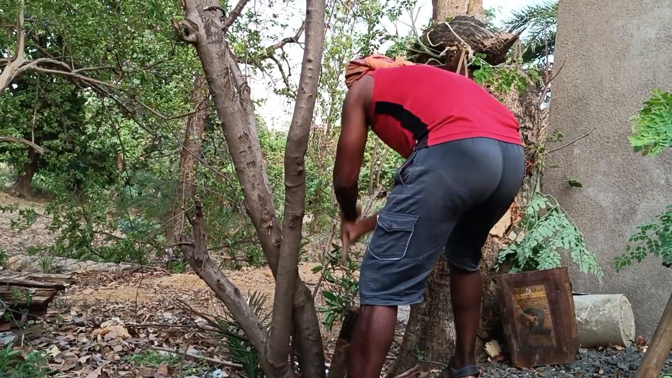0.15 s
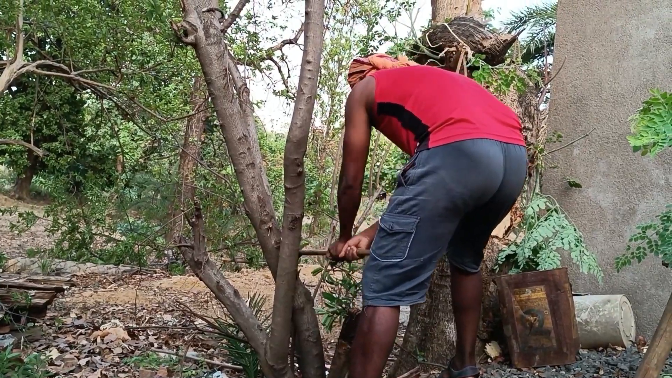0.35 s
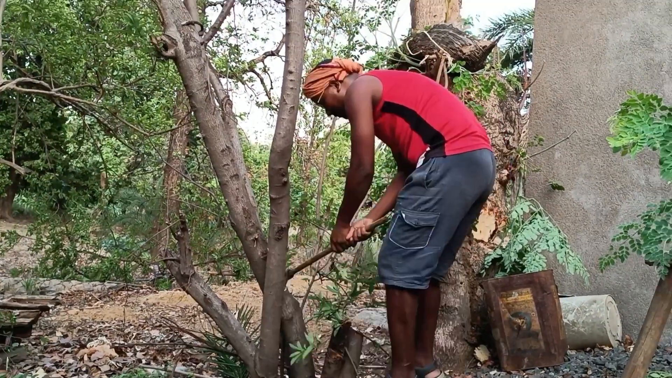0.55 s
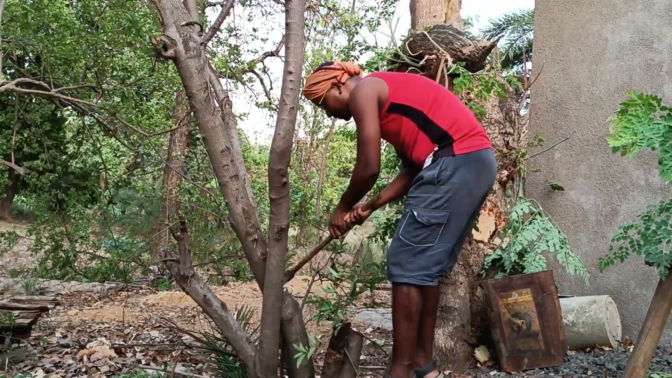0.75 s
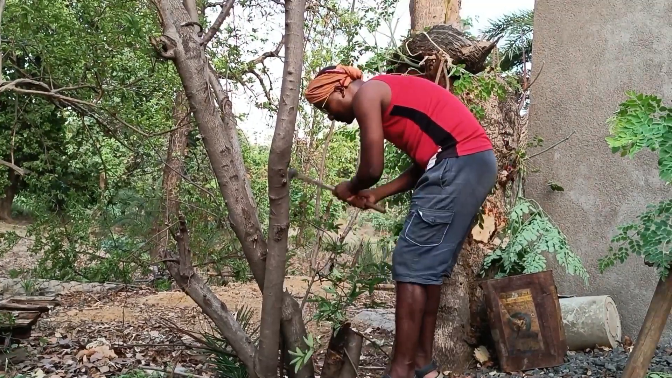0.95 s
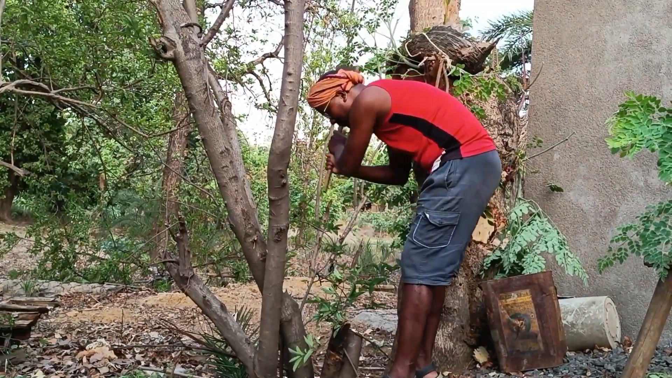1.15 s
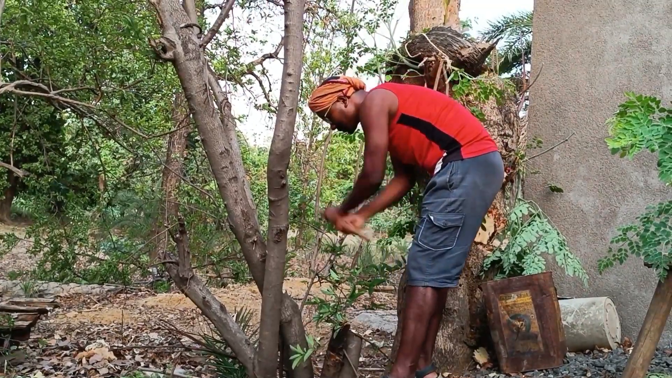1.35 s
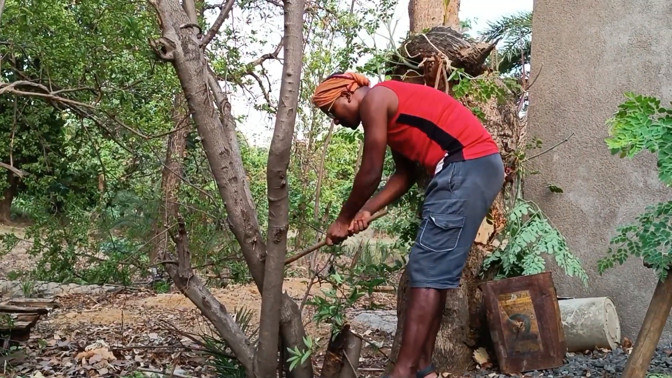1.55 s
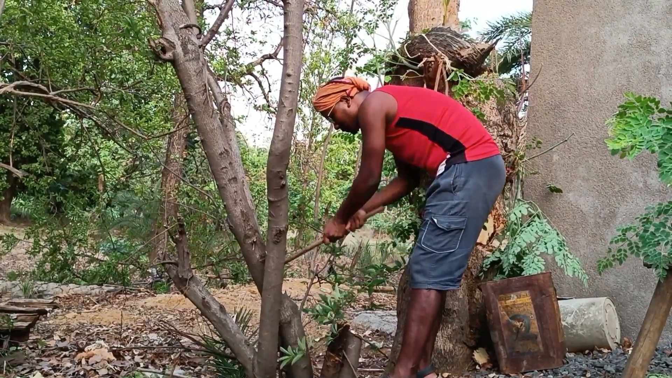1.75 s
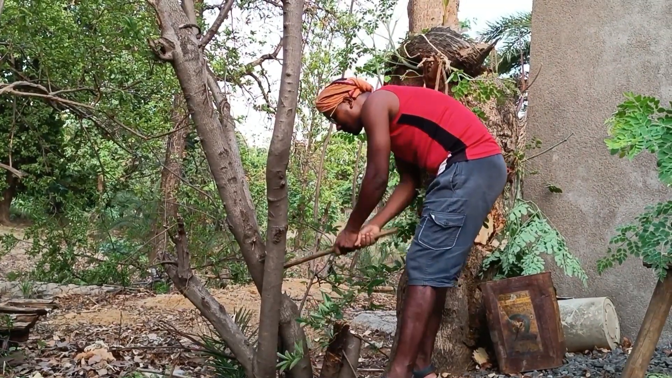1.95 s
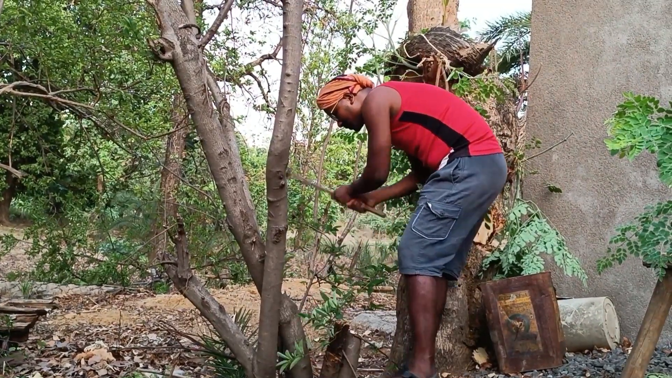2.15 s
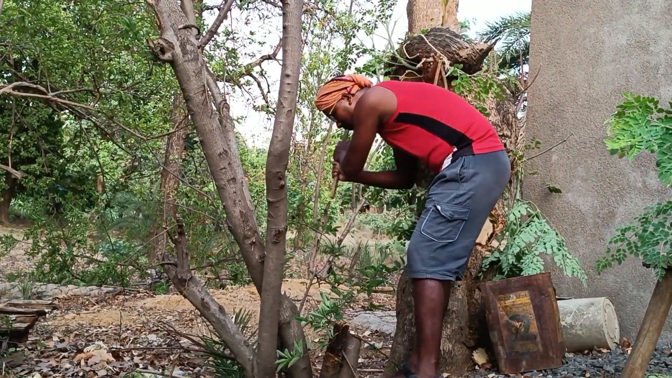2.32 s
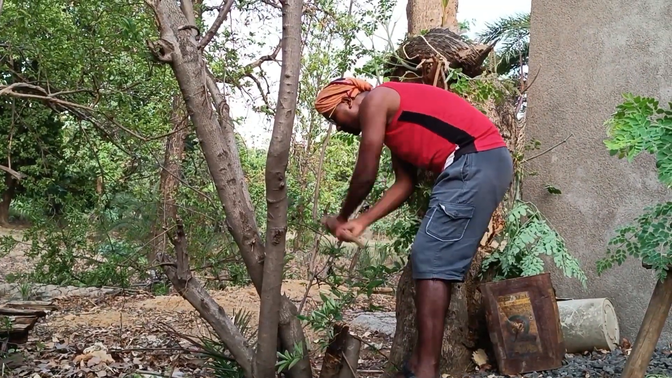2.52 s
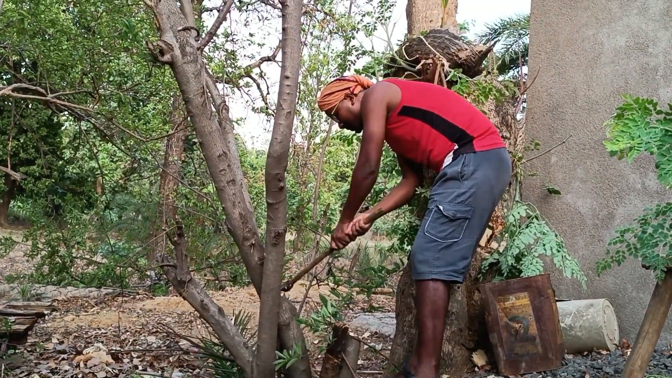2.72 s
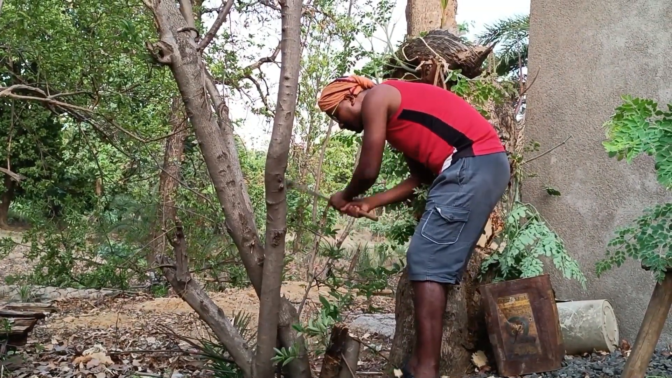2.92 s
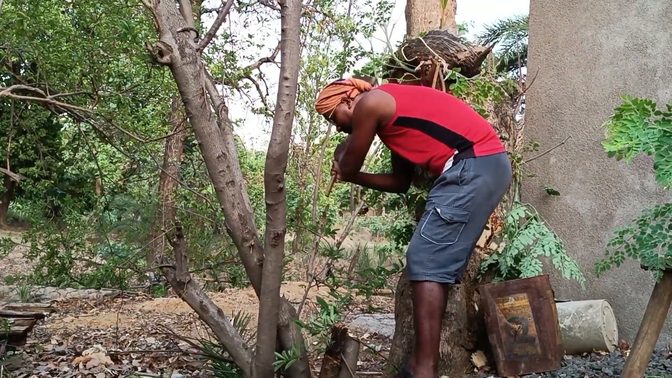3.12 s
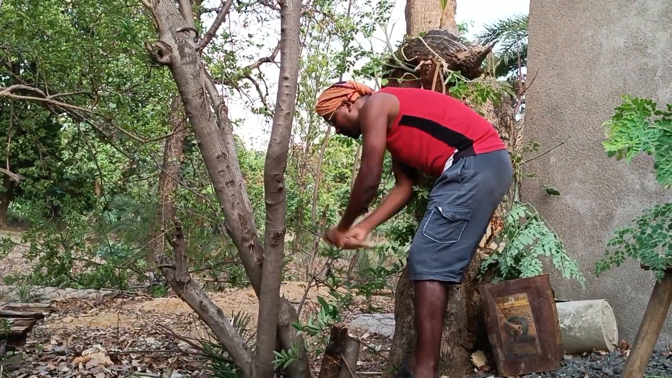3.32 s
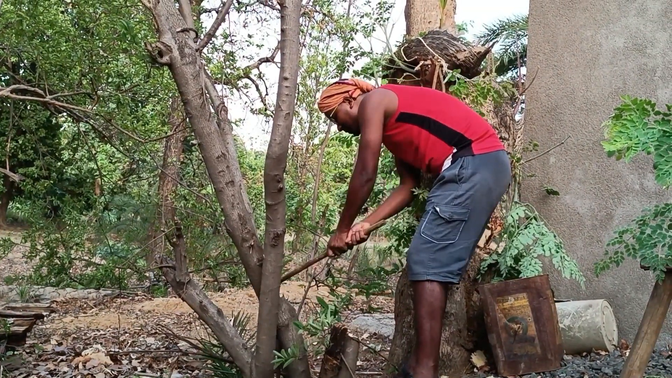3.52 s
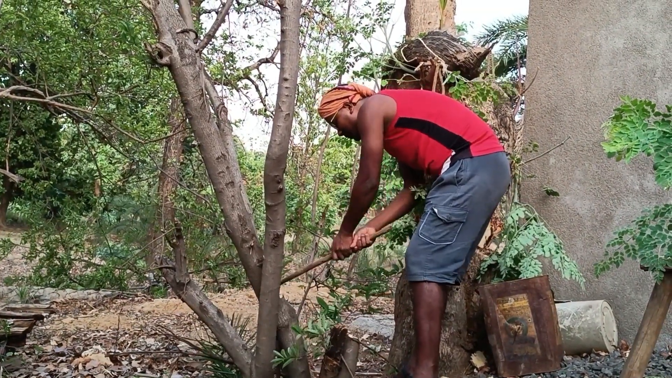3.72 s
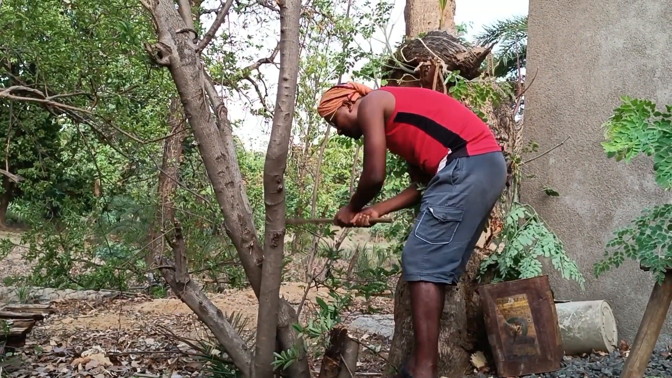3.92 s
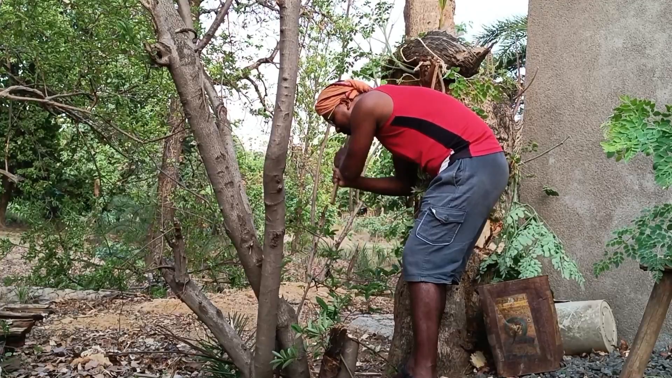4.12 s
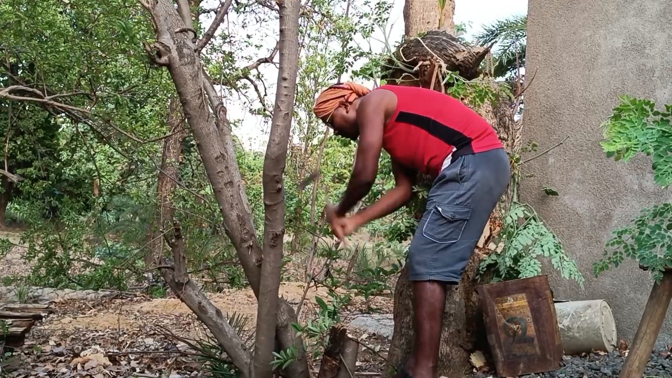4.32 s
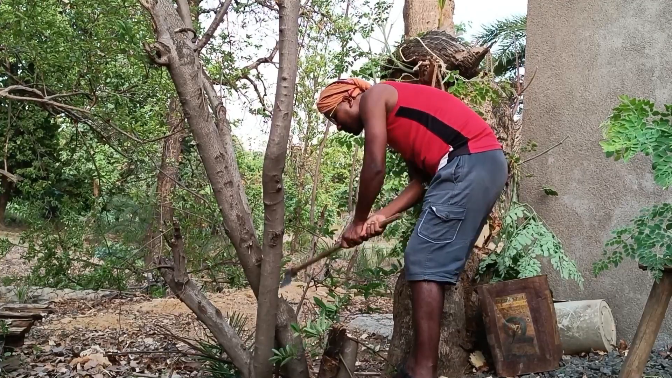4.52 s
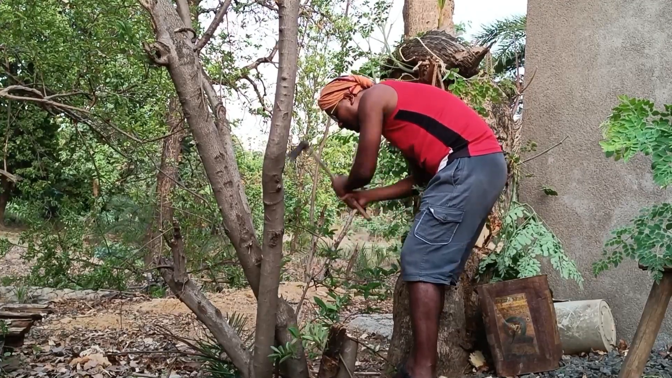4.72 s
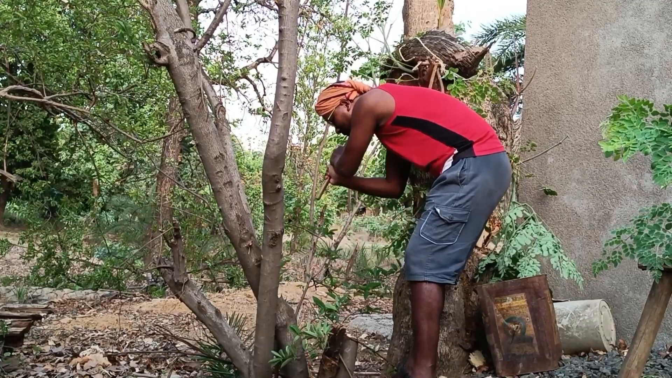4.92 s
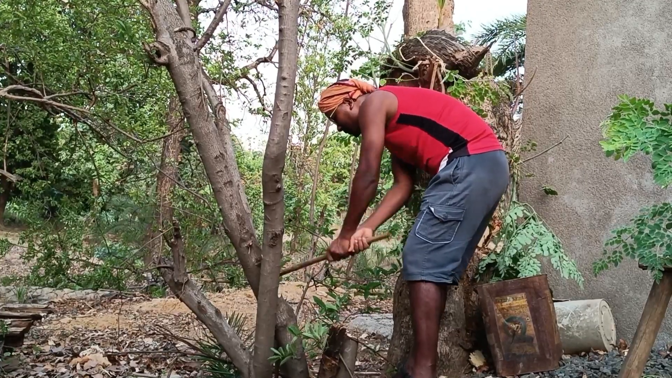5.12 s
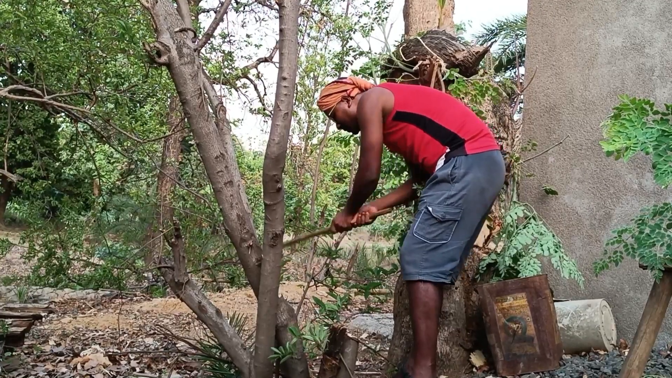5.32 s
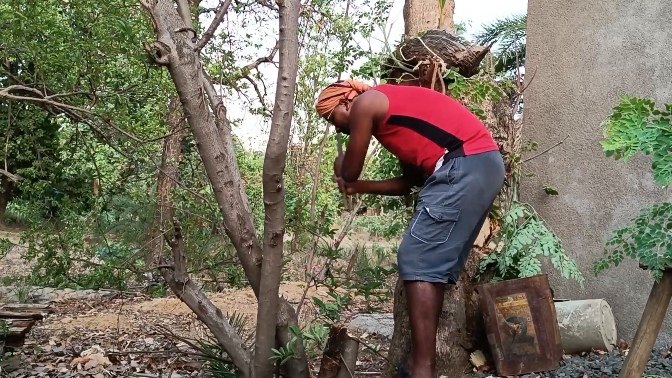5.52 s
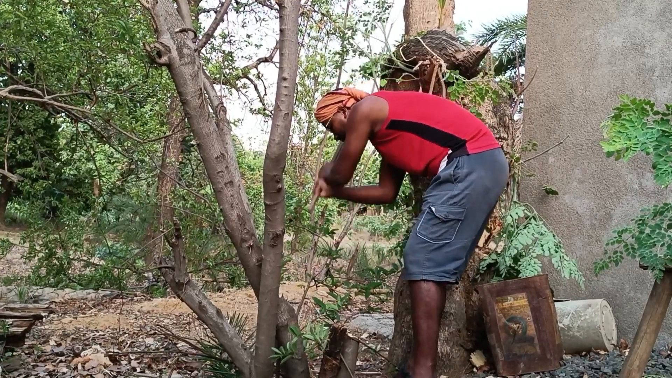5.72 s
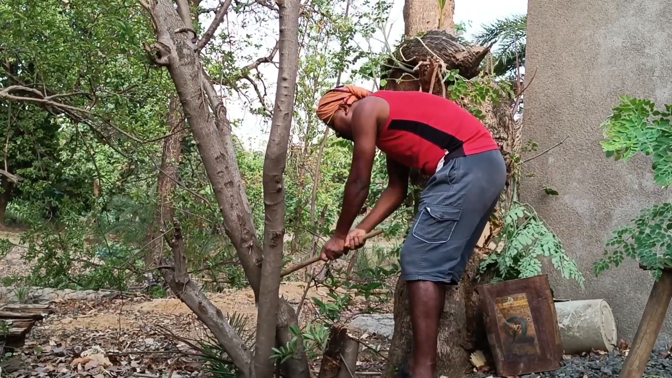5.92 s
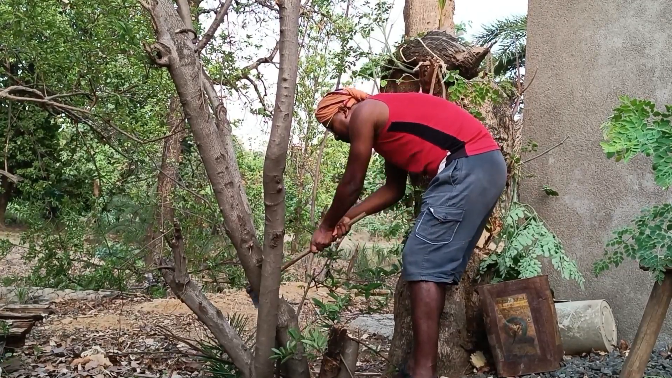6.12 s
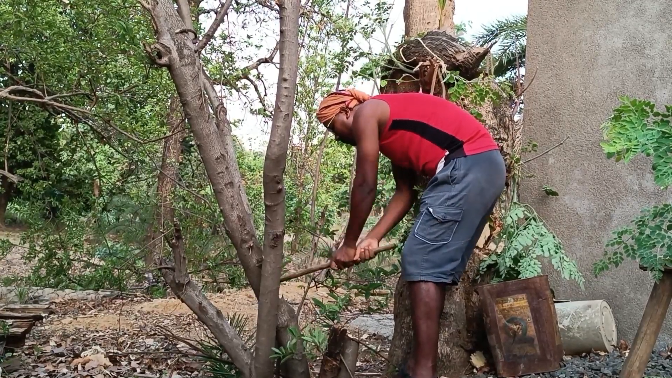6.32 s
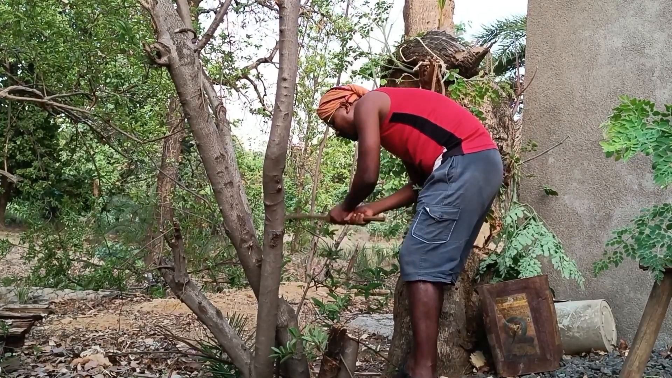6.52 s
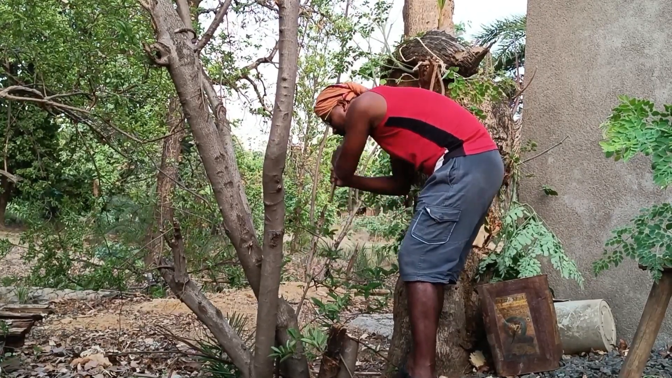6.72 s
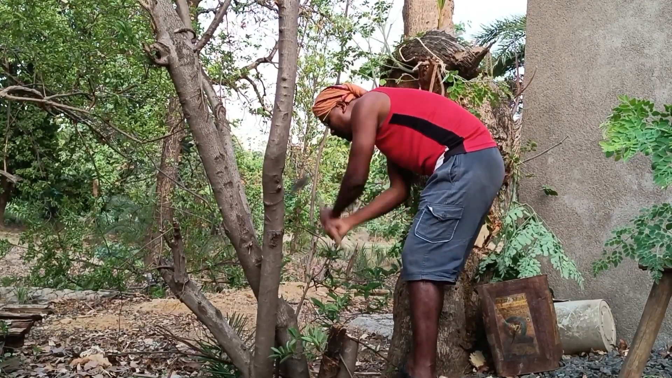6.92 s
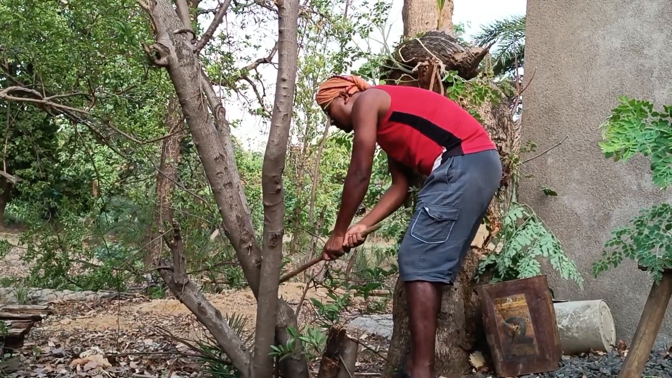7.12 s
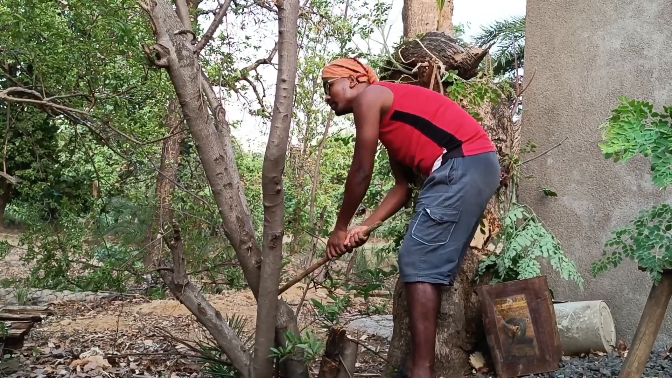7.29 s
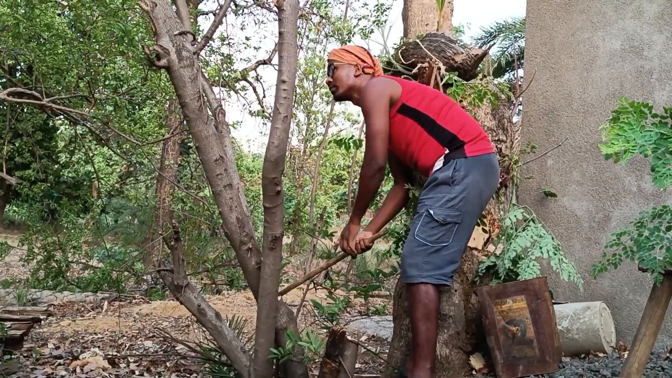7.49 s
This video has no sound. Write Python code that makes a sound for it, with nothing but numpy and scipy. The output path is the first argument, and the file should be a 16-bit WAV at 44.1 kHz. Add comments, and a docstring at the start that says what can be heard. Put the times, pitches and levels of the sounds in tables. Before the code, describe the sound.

An axe chops eight times into a small live tree in a yard, about once a second. Each blow is a sharp woody crack with a low boom from the trunk, often a brief metallic ping, then a short echo and a rustle of leaves. Between blows twigs snap, feet scuff dry litter and the handle knocks softly. Faint insects sing steadily and a distant bird whistles a few notes.

```python
"""Insects sing steadily in a yard beside a house wall, and an axe chops eight times into a small live tree.
At each blow fibres tear, the axe head pings and the bent trunk booms; wall and yard return echoes.
A moment later the jolt shakes the leaves of the crown, and after some blows dry twigs rattle.
Between blows twigs snap, feet shift in the dry litter, a far bird whistles and the handle knocks softly.
As the notch opens, the trunk rings longer."""
import sys
import numpy as np
from scipy import signal
from scipy.fft import rfft, irfft
from scipy.io import wavfile
from scipy.ndimage import uniform_filter1d

SR = 44100
rng = np.random.default_rng(int(sys.argv[2]) if len(sys.argv) > 2 else 0)


def wrap_up_sound(samples):
    """Save the sound to the file named by the first command line argument, as 16-bit audio."""
    columns = np.atleast_2d(samples).T
    # keep every value between -1 and 1, then stretch to whole-number steps
    tamed = np.clip(columns, -1, 1)
    steps = np.round(tamed * 32767).astype(np.int16)
    wavfile.write(sys.argv[1], SR, steps)


N = 332955
TIME = np.arange(N) / SR
AGE = np.arange(SR) / SR   # seconds since an onset
WALL_DELAY = round(.0186 * SR)   # lag of the echo from the house wall, in samples

# Balance of the tree, which stands to the right. Each row: frequency in Hz, left minus right in dB.
TREE_LEAN = [(100, -1.9), (1200, -1), (2400, -3.5), (4400, -3.5), (8000, -13), (11000, 5), (15000, -4)]
# Balance of the ambient sound. Each row: frequency in Hz, left minus right in dB.
AIR_LEAN = [(100, 3.5), (1500, -0.5), (5000, -6), (8000, -13.5), (14000, 4)]


def from_db(db):
    """Amplitude ratio of a level in decibels."""
    return 10 ** (np.asarray(db) / 20)


def rms_one(x):
    """Normalisation to unit mean power."""
    return x / np.sqrt(np.mean(x ** 2) + 1e-20)


def burst_one(x):
    """Normalisation to the energy of 30 ms at unit power."""
    return rms_one(x) * np.sqrt(.03 * SR / x.shape[-1])


def at_hz(points, hz):
    """Interpolation on a logarithmic frequency axis."""
    known, values = np.transpose(points)
    return np.interp(np.log(hz + 1e-9), np.log(known), values)


def fade(t60):
    """Exponential damping: the level falls 60 dB in t60 seconds."""
    return from_db(-60 * AGE / t60)


def add(out, start_s, sound):
    """Superposition: a sound joins the mix at its start time."""
    at = round(start_s * SR)
    out[:, at:at + SR] += sound[..., :N - at]


def band(x, low_hz, high_hz):
    """Causal band-pass filtering."""
    sections = signal.butter(2, [low_hz, min(high_hz, .45 * SR)], "band", fs=SR, output="sos")
    return signal.sosfilt(sections, x + 1e-18)


def resonate(x, hz, width_hz):
    """Two-pole resonance with unit gain at its peak."""
    radius = np.exp(-np.pi * width_hz / SR)
    feedback = [1, -2 * radius * np.cos(2 * np.pi * hz / SR), radius ** 2]
    return signal.lfilter(np.array([1, 0, -1]) * (1 - radius ** 2) / 2, feedback, x + 1e-18)


def spread(mid, side, hz, lean=TREE_LEAN):
    """Partial coherence: two unrelated signals become left and right, alike only in the bass."""
    # Likeness of the channels. Each row: frequency in Hz, correlation.
    coherence = [(60, .985), (130, .965), (290, .94), (640, .72), (1400, .2), (4000, .05), (15000, 0)]
    alike = at_hz(coherence, hz)
    sides = np.array([[1], [-1]])
    balance = from_db(sides * at_hz(lean, hz) / 2)
    return (np.sqrt(1 + alike) * mid + np.sqrt(1 - alike) * side * sides) * balance


def noise(spectrum, size, grain_db=0, clump_db=0, tilt_db=0, lean=TREE_LEAN):
    """Granular noise of unit power: clicks vary in size by grain_db and bunch in clumps of a few ms."""
    hz = np.arange(size // 2 + 1) * SR / size
    clumps = rms_one(uniform_filter1d(rng.standard_normal(size), 130))
    clicks = rng.standard_normal((2, size))
    clicks *= from_db(grain_db * rng.standard_normal(size) + clump_db * clumps)
    mid, side = rfft(clicks)
    colour = from_db(at_hz(spectrum, hz) + tilt_db * np.log2(np.maximum(hz, 500)))
    return rms_one(irfft(spread(mid, side, hz, lean) * colour, size))


def air():
    """Stationary broadband noise: the faint background of still air."""
    # Ambient spectrum. Each row: frequency in Hz, relative level in dB.
    spectrum = [(20, -55), (35, -13.5), (110, 1.5), (230, -9), (340, -9), (520, -17.5), (1400, -17.5),
                (2300, -14), (3200, -17), (4200, -21), (5200, -13.5), (6300, -21), (8000, -15.5),
                (9600, -26.5), (15000, -27)]
    return from_db(-56.5) * noise(spectrum, N, lean=AIR_LEAN)


def insects():
    """Incoherent summation: a chorus of insects merges into steady bands of noise."""
    # Bands of the chorus. Each row: centre in Hz, resonator width in Hz, level in dB.
    chorus = [(4940, 280, -73), (5100, 600, -70.5), (6980, 25, -72), (7360, 33, -69.5), (7560, 22, -68.5),
              (7800, 30, -75), (7240, 410, -66.5), (8340, 28, -70), (8840, 32, -71.5), (8600, 1000, -72)]
    out = np.zeros((2, N))
    for hz, width_hz, db in chorus:
        song = resonate(rng.standard_normal((2, N)), hz, width_hz)
        mid, side = resonate(song, hz, width_hz)
        out += from_db(db) * rms_one(spread(mid, side, hz, AIR_LEAN))
    return out


def surroundings(scatter_db=-4, wall_db=-13, dull_hz=4000):
    """Impulse response of the near yard: direct sound, scatter from ground and clutter, one wall slap."""
    size = SR // 4
    envelope = fade(.15) * (1 - np.exp(-AGE / .0025))
    scatter = noise([(100, .018), (16000, 0)], size, lean=AIR_LEAN) * envelope[:size]
    echoes = from_db(scatter_db) * rms_one(scatter) / np.sqrt(size)
    echoes[:, WALL_DELAY] += from_db(wall_db)
    response = signal.sosfilt(signal.butter(1, dull_hz, fs=SR, output="sos"), echoes)
    response[:, 0] += 1   # direct path
    return response


def cut(knock_db, crack_db, bright_db, cut_s, pivot_hz=2000):
    """Fracture excites resonance: fibres tear as the blade sinks in, a few more as the chip splits."""
    # Short resonances of cut wood and axe. Each row: centre in Hz, width in Hz, relative level in dB.
    resonances = [(398, 180, 2), (507, 20, -13.5), (637.6, 25, 1.5), (690, 25, -3), (883, 56, 1),
                  (958, 33, -0.5), (1020, 32, 2), (1087, 47, -3.5), (1360, 41, 2), (1527, 34, 9.5),
                  (1670, 42, 1), (1747, 51, -1.5), (1938, 26, -2), (2610, 23, -2), (2640, 160, -3.5),
                  (2880, 190, -6), (3200, 260, -1), (3720, 840, -3), (4672, 67, -2.5), (4550, 140, -16.5),
                  (6480, 880, -17), (9900, 9000, -31), (14500, 920, -24)]
    # Colour of an average crack. Each row: lower and upper edge in Hz, relative level in dB.
    crack_bands = [(694, 1386, 0.23), (1426, 2013, -0.5), (2370, 4070, 0), (4400, 49000, -3.5)]
    size = SR // 4
    response = surroundings()
    bite = (AGE / cut_s) ** 2 * np.exp(2 - 2 * AGE / cut_s)
    split = from_db(-21) * fade(.17) * (1 - np.exp(-AGE / cut_s))
    wood = 0
    for hz, width_hz, db in resonances:
        fibres = rng.standard_normal((2, size)) * (bite + split)[:size]
        mid, side = map(rms_one, resonate(fibres, hz, width_hz))
        wood += from_db(db) * np.sqrt(width_hz) * spread(mid, side, hz)
    heard = signal.fftconvolve(wood, response, axes=-1)[:, :size]
    heard = np.pad(heard, ((0, 0), (0, SR - size)))
    out = from_db(knock_db - 2.5) * burst_one(band(heard, 303, 833))   # the hollow part of the cut
    # a clean bite tilts the crack towards the treble, a blunt one towards the bass
    for low_hz, high_hz, db in crack_bands:
        octaves = np.log2(np.sqrt(low_hz * high_hz) / pivot_hz)
        out += from_db(crack_db + db + bright_db * octaves) * burst_one(band(heard, low_hz, high_hz))
    return out


def ping(hz, cut_s, t60=.014, top_hz=3830):
    """Damped free vibration: the axe head rings for an instant before the wood grips it."""
    # Modes of the axe head. Each row: multiple of the ping frequency, relative level in dB.
    modes = [(1, 1.5), (1.47, 1.5), (1.96, 1)]
    phase = 2 * np.pi * hz * AGE + rng.uniform(0, 1, (2, 1))
    tone = 0
    for multiple, db in modes:
        excitation = 1 / (1 + (multiple * hz / top_hz) ** 10)   # wood is too soft to ring higher modes
        tone += from_db(db) * excitation * np.sin(multiple * phase)
    onset = 1 - np.exp(-(AGE / cut_s) ** 2)
    return tone * fade(t60) * onset * from_db([[-.7], [.7]])


def trunk(boom_db, thud_db, knock_db, ring, detune=.007, push_s=.006, wall_db=-10):
    """Bending modes: the blade pushes the trunk, close modes beat, and the wall reflects the boom."""
    # Modes of the trunk. Each row: frequency in Hz, relative level in dB, t60 in seconds at ring = 1.
    modes = [(65, -28.5, 0.89), (116, -29, 0.067), (130.8, -0.5, 0.31), (142.7, -3.5, 0.26),
             (159.9, -7, 0.28), (209.8, -0.5, 0.23), (237, -4.5, 0.31), (272, -16, 0.3),
             (306.6, -14.5, 0.21), (385, -9, 0.22), (394, -16, 0.32), (434, -6, 0.21), (523, -18.5, 0.16),
             (577, -26, 0.3)]
    # Mode groups in Hz: boom up to the first entry, thud between the next two, knock from the last.
    groups_hz = [165, 205, 240, 380]
    out = 0
    for k, (hz, db, t60) in enumerate(modes):
        # where the blade lands weights the groups
        strength = from_db(db + np.interp(hz, groups_hz, [boom_db, thud_db, thud_db, knock_db]))
        hz *= 1 + detune * rng.standard_normal()   # the lodged axe loads the trunk differently each time
        phase = 2 * np.pi * hz * AGE
        mid, side = np.sin(phase), np.cos(phase) * rng.choice([-1, 1])
        polarity = (-1) ** ((k + 1) // 2)   # pairs of modes start opposed
        out += polarity * strength * fade(ring * t60) * spread(mid, side, hz)
    out *= 1 - np.exp(-AGE / push_s)
    reflection = np.pad(out, ((0, 0), (WALL_DELAY, 0)))[:, :SR]
    return out + from_db(wall_db) * reflection


def yard_echo():
    """Reverberation: the dull echo of the yard builds up quickly and dies away."""
    # Spectrum of the echo. Each row: frequency in Hz, relative level in dB.
    spectrum = [(30, -39), (50, -21), (65, -3), (90, -17.5), (130, 8.5), (220, -7), (300, -9), (430, -13.5),
                (700, -17.5), (1100, -22.5), (2000, -20), (4000, -26), (12000, -37.5)]
    return noise(spectrum, SR) * fade(.4) * (1 - np.exp(-AGE / .018))


def crown(tilt_db, climb_s=.086, shoots_db=-17):
    """Propagation delay: low shoots stir at once; the jolt climbs the trunk and the crown shivers."""
    # Rustle of the leaves before tilting. Each row: frequency in Hz, relative level in dB.
    spectrum = [(400, -11.5), (800, -13), (1130, -4), (1350, -8), (2000, -2.5), (3200, -1.5), (4200, -4.5),
                (5500, -1), (7200, -1), (9500, -4), (13000, -3), (15500, -5.5)]
    arrival = from_db(shoots_db) + 1 / (1 + np.exp(-(AGE - climb_s) / .017))
    settling = fade(.32) + from_db(-21) * fade(1.12)
    shake = arrival * (1 - np.exp(-AGE / .0054)) * settling
    return shake / shake.max() * noise(spectrum, SR, grain_db=5.2, clump_db=1.7, tilt_db=tilt_db)


def chops(ring_uncut=.45, ring_notched=1.22, notch_s=1.1):
    """Impact excitation: each blow sets off boom, crack, ping, echo and shaken leaves."""
    # Axe blows. Each row: start in seconds, relative levels of boom, thud, knock and crack in dB,
    # brightness in dB per octave, cutting time in seconds, leaf gain in dB, ping in Hz, its gain in dB.
    blows = [(0.3874, -11.5, -14, -20.5, -18, -1, 0.0046, -39, 3390, 5.5),
             (1.565, -13.5, -17, -23.5, -19.5, 0.7, 0.0037, -38.5, 940, -20),
             (2.7305, -17.5, -17, -19, -19, -0.5, 0.0029, -34, 1480, -12),
             (3.5186, -20, -18.5, -15.5, -19.5, -1, 0.0017, -33, 1790, 3.5),
             (4.543, -17.5, -19.5, -24, -19.5, 1.26, 0.0042, -34, 954, -4),
             (5.257, -20.5, -28, -17.5, -17.5, 0.57, 0.0037, -39, 904, 2),
             (6.007, -16, -28.5, -20, -21.5, -0.5, 0.0029, -36, 894, -6),
             (7.147, -16.5, -17.5, -15.5, -19.5, -1.4, 0.0033, -34.5, 901, 1)]
    out = np.zeros((2, N))
    for start_s, boom_db, thud_db, knock_db, crack_db, bright_db, cut_s, leaf_db, ping_hz, ping_db in blows:
        # the trunk's decay times lengthen as the notch opens
        ring = ring_notched + (ring_uncut - ring_notched) * np.exp(-start_s / notch_s)
        boom = from_db(-2) * trunk(boom_db, thud_db, knock_db, ring)
        crack = cut(knock_db, crack_db, bright_db, cut_s)
        axe_head = from_db(ping_db) * ping(ping_hz, cut_s)
        echo = from_db((boom_db + knock_db) / 2 - 5) * yard_echo()
        leaves = from_db(leaf_db) * crown(tilt_db=-2.23 + .45 * bright_db)
        add(out, start_s, boom + crack + axe_head + echo + leaves)
    return out


def rattles(spread_s=.019, width_hz=220):
    """Repeated impacts drive a resonance: a shaken twig chatters on its neighbours at one pitch."""
    # Buzzes of dry twigs. Each row: loudest moment in seconds, level in dB, pitch in Hz.
    buzzes = [(.51, -42.5, 1090), (1.7, -46, 3330), (3.64, -48, 1240), (3.732, -52.5, 1140),
              (5.38, -43, 3470)]
    chatter = noise([(100, 0), (16000, 0)], N, grain_db=5.5, clump_db=3)
    out = np.zeros((2, N))
    for peak_s, db, hz in buzzes:
        envelope = np.exp(-((TIME - peak_s) / spread_s) ** 2 / 2)
        ringing = resonate(resonate(chatter, hz, width_hz), hz, 2 * width_hz)
        out += from_db(db) * envelope * rms_one(ringing)
    return out


def snaps():
    """Brittle fracture: a twig or chip breaks with a crackle, and its size sets where it resonates."""
    # Breaks. Each row: start in seconds, gain in dB, t60 of the tail in seconds, resonance in Hz.
    breaks = [(.666, -38, .04, 5500), (.78, -47, .05, 6000), (2.092, -46, .05, 9000),
              (2.422, -43, 0.064, 5960), (3.235, -52.5, 0.09, 3620), (3.434, -49.5, .04, 7000),
              (4.223, -50.5, 0.06, 12070), (4.376, -43, 0.14, 3250), (5.002, -44, 0.33, 4160),
              (5.146, -40, 0.17, 3160), (5.813, -48, 0.12, 2450), (5.926, -49.5, .07, 6020),
              (6.636, -50.5, .06, 9080), (7.098, -45, 0.11, 12900)]
    # Spectrum of the crackle. Each row: frequency in Hz, relative level in dB.
    spectrum = [(500, -18), (1800, -8), (3200, 0), (7000, -2), (10000, -6), (15000, -6)]
    out = np.zeros((2, N))
    for start_s, db, t60, hz in breaks:
        crackle = noise(spectrum, SR, grain_db=4, clump_db=2)
        snap = rms_one(.82 * crackle + resonate(crackle, hz, hz / 4))
        envelope = fade(.011) + from_db(-1.5) * fade(t60)
        add(out, start_s, from_db(db) * snap * envelope)
    return out


def scuffs(settle_ratio=1.44):
    """Friction noise: feet rub the dry litter, whose rustle settles more slowly than it swells."""
    # Shifts of the feet. Each row: loudest moment in seconds, level in dB, swell time in seconds.
    shifts = [(0.669, -39, 0.025), (0.809, -49, 0.021), (0.901, -52.5, 0.031), (2.095, -52.5, 0.067),
              (2.217, -44, 0.019), (2.367, -38, 0.02), (2.541, -48, 0.011)]
    # Spectrum of the litter. Each row: frequency in Hz, relative level in dB.
    spectrum = [(88, -42), (150, -31), (244, 4.5), (649, -19.5), (1020, -6.5), (1560, -17), (1940, -5),
                (5910, -5), (10000, -11.5), (14800, -11.5), (16000, -10.5)]
    rubbing = 0
    for peak_s, db, swell_s in shifts:
        width_s = np.where(TIME < peak_s, swell_s, settle_ratio * swell_s)
        rubbing += from_db(db) / (1 + ((TIME - peak_s) / width_s) ** 2 / 2) ** 2
    return rubbing * noise(spectrum, N, grain_db=4, clump_db=1.9)


def bird(waver_hz=30, arch_hz=271, long_note_s=.15):
    """Frequency modulation: each far whistle wavers and arches in pitch, the more the longer it lasts."""
    # Notes. Each row: start and length in seconds, pitch at the ends in Hz, gain in dB.
    notes = [(1.07, 0.078, 2370, -55.5), (1.19, .15, 2330, -58), (1.41, 0.12, 2340, -60),
             (6.585, 0.062, 2150, -63.5), (6.785, 0.074, 2190, -64), (6.845, 0.044, 2140, -61.5)]
    out = np.zeros((2, N))
    for start_s, length_s, hz, db in notes:
        arch = np.sin(np.pi * np.minimum(AGE / length_s, 1)).clip(0)
        waver = waver_hz * rms_one(band(rng.standard_normal(SR), 20, 120))
        pitch_hz = hz + waver + arch_hz * (length_s / long_note_s) ** 4 * arch
        whistle = np.sin(2 * np.pi * np.cumsum(pitch_hz) / SR)
        add(out, start_s, from_db(db) * np.sqrt(arch) * whistle)
    # many paths through the trees blur the whistle
    blur = .8 + .6 * rms_one(band(rng.standard_normal((2, N)), 12, 90))
    return out * blur


def handle_knocks():
    """Heavily damped vibration: the handle knocks with one brief tone and a hollow burst of noise."""
    # Soft knocks. Each row: start in seconds, gain in dB, pitch in Hz.
    knocks = [(1.077, -37, 1020), (5.796, -42.5, 390), (6.673, -40, 584), (6.955, -49.5, 387)]
    out = np.zeros((2, N))
    for start_s, db, hz in knocks:
        tone = np.sin(2 * np.pi * hz * AGE) * fade(.036)
        hollow = rms_one(band(rng.standard_normal(SR), 310, 850)) * fade(.07)
        add(out, start_s, from_db(db) * (tone + from_db(-4.5) * hollow))
    return out


def scene():
    """Superposition of the chopping, the small sounds around it and the life of the yard."""
    return chops() + rattles() + handle_knocks() + snaps() + scuffs() + air() + insects() + bird()


def record(dry, port_hz=15100, cutoff_hz=15650):
    """Band limiting and saturation: the microphone sheds deep bass, rings at its port and rounds peaks."""
    thinned = signal.sosfilt(signal.butter(1, 35, "high", fs=SR, output="sos"), dry)
    coloured = thinned + resonate(thinned, port_hz, width_hz=1300)
    rounded = 1.29 * np.tanh(coloured / 1.272)
    return signal.sosfilt(signal.ellip(10, .2, 80, cutoff_hz, fs=SR, output="sos"), rounded)


dry = scene()
out = record(dry)
wrap_up_sound(out)
```